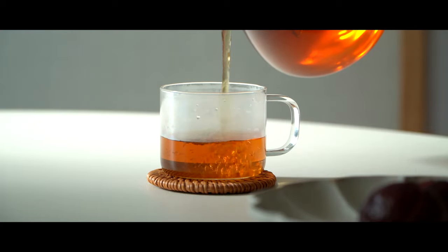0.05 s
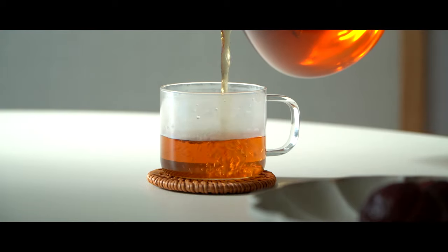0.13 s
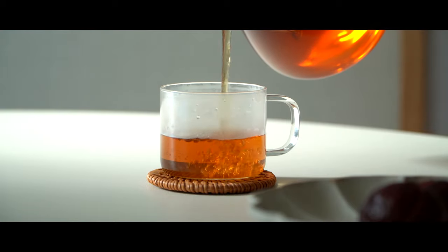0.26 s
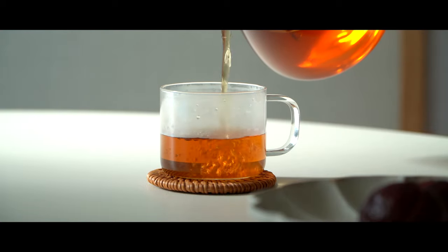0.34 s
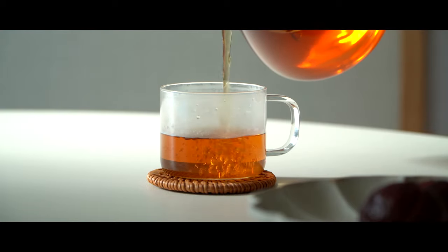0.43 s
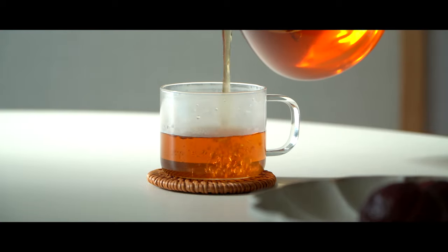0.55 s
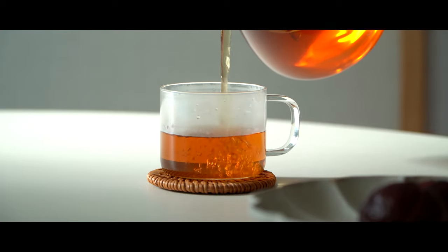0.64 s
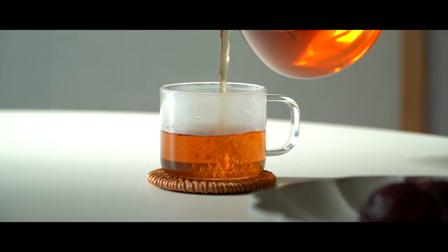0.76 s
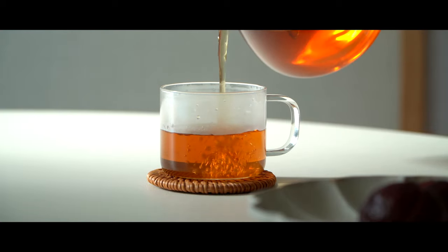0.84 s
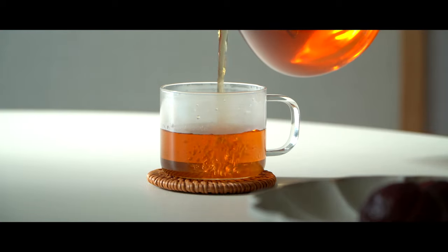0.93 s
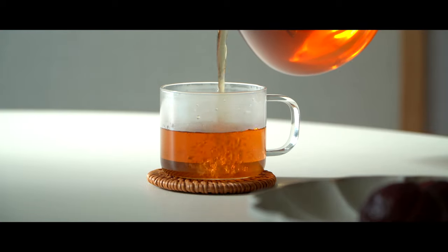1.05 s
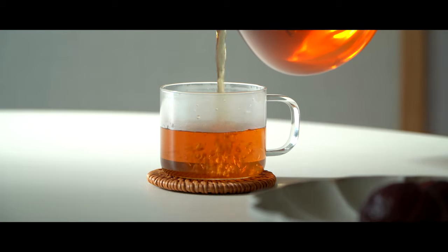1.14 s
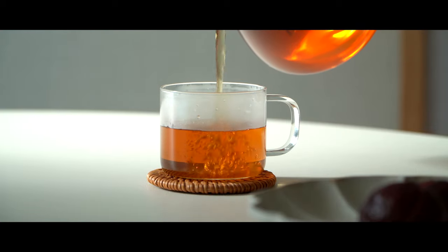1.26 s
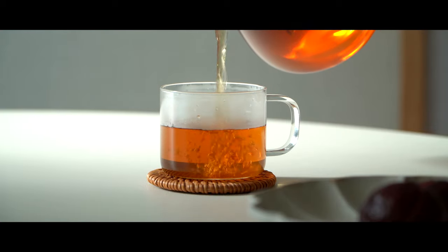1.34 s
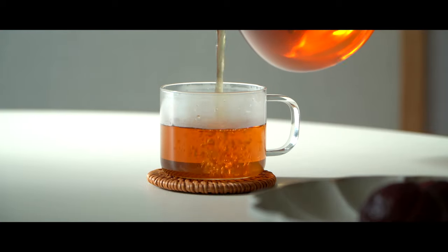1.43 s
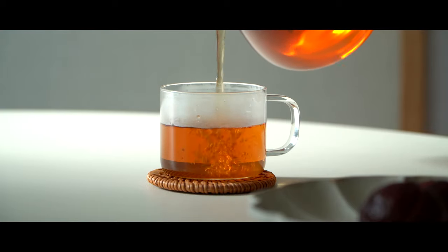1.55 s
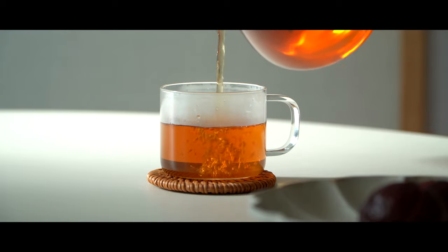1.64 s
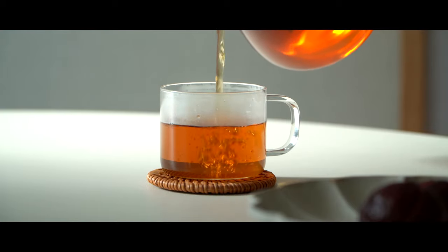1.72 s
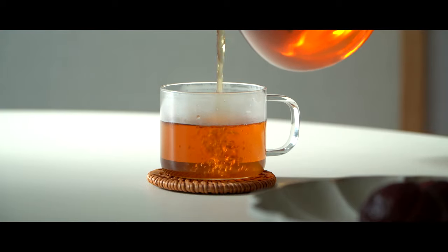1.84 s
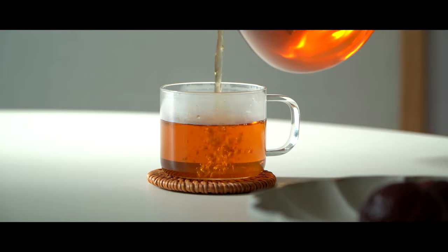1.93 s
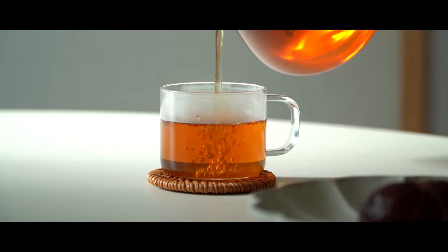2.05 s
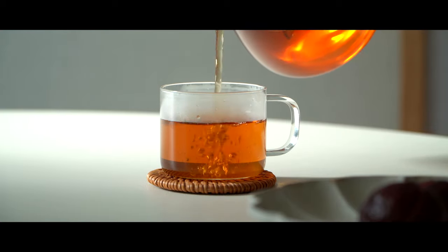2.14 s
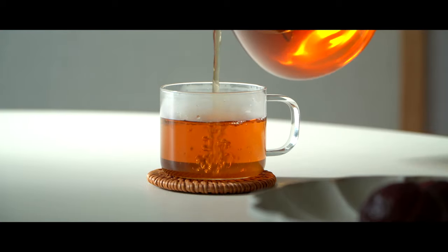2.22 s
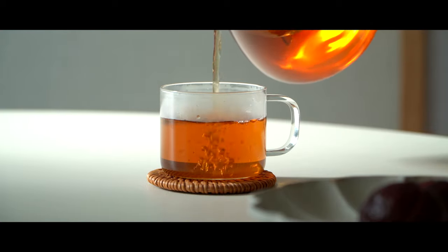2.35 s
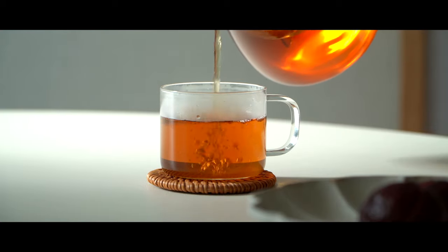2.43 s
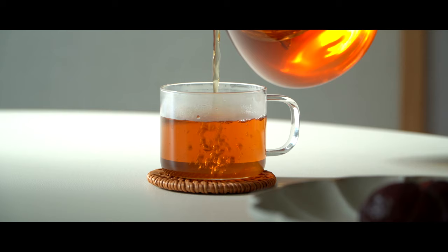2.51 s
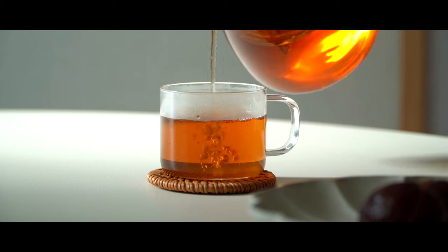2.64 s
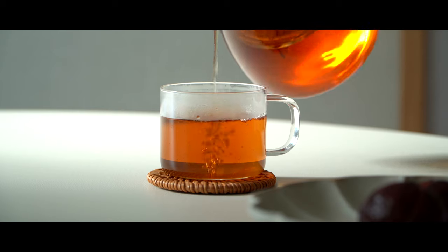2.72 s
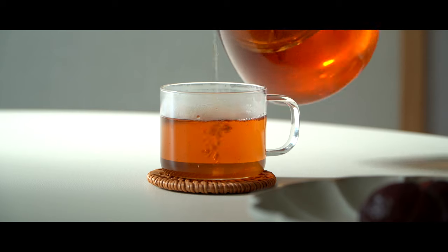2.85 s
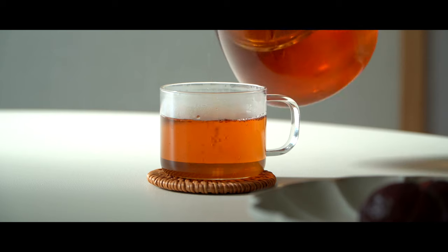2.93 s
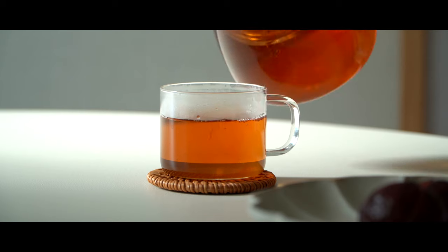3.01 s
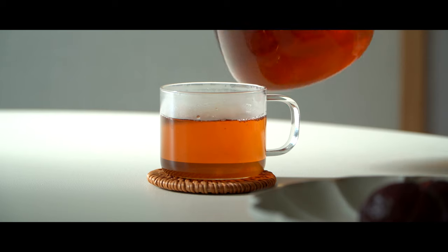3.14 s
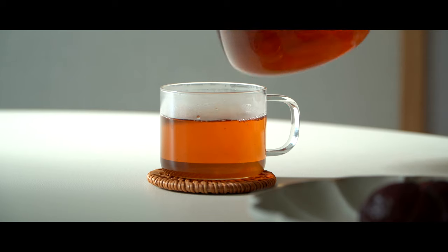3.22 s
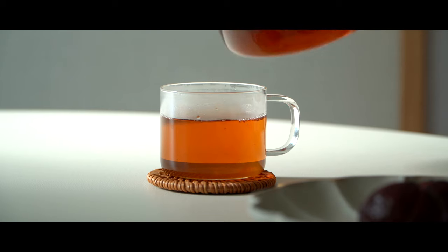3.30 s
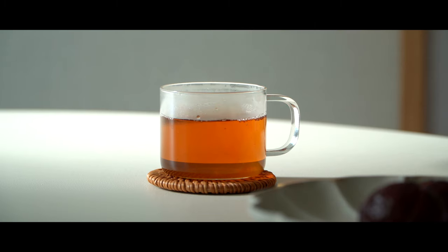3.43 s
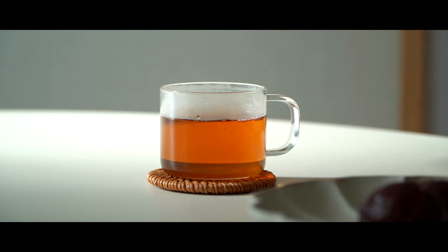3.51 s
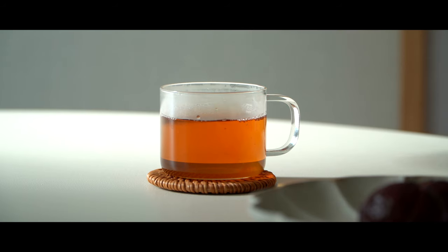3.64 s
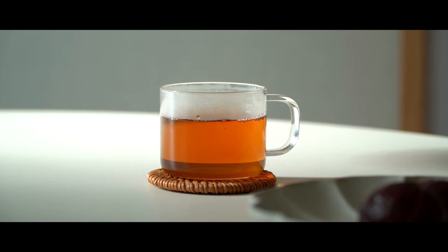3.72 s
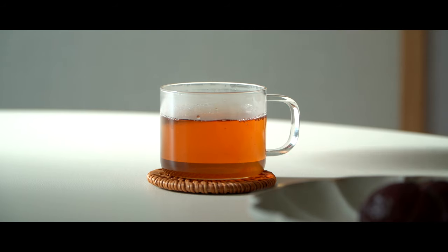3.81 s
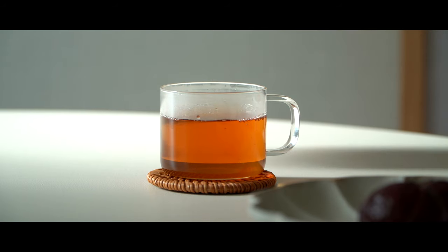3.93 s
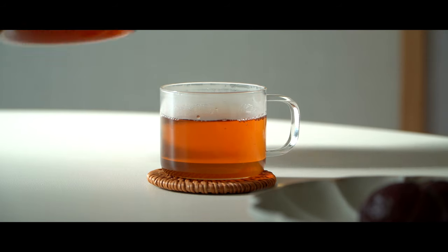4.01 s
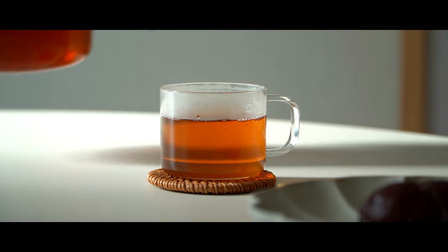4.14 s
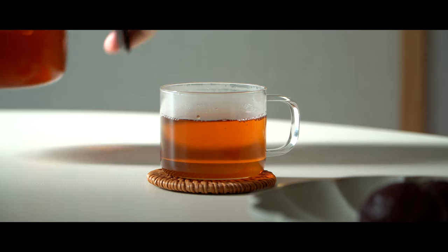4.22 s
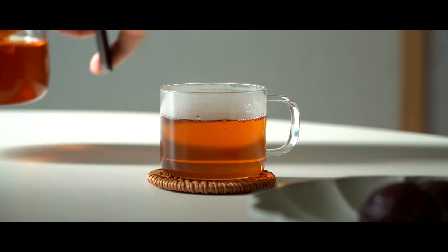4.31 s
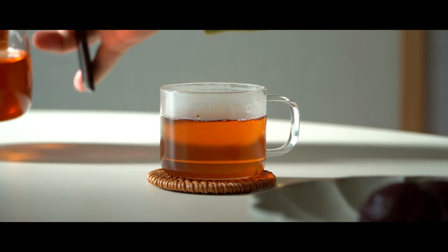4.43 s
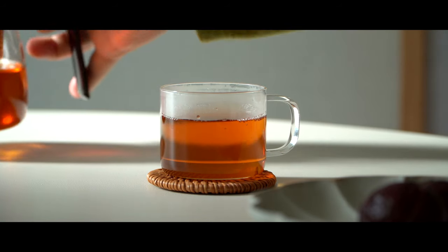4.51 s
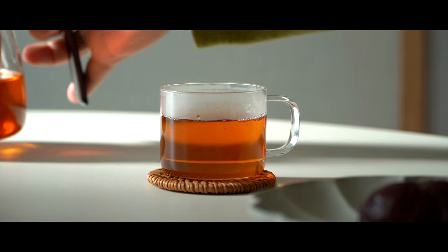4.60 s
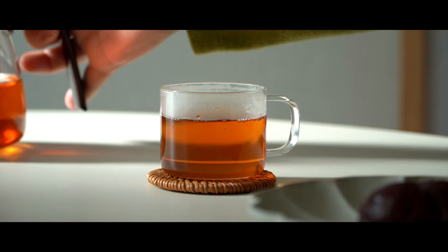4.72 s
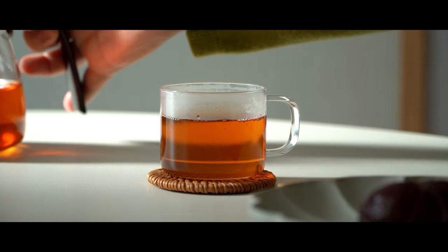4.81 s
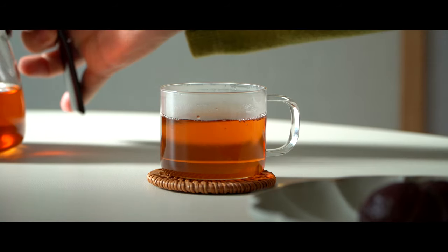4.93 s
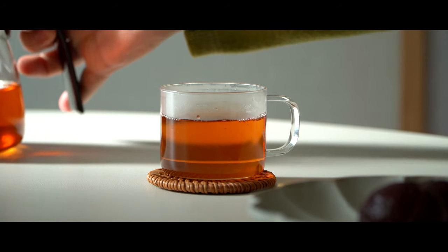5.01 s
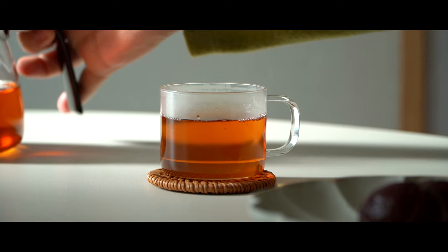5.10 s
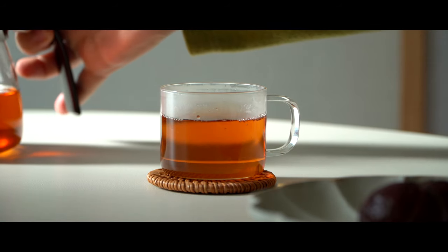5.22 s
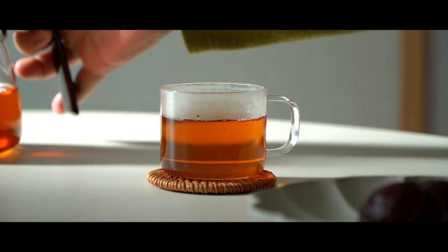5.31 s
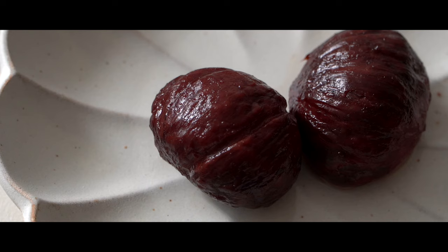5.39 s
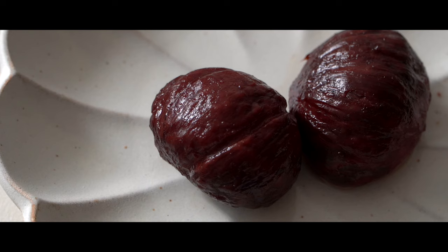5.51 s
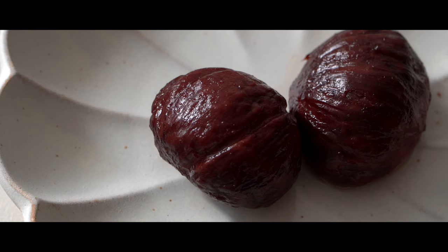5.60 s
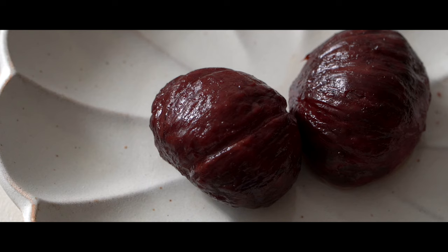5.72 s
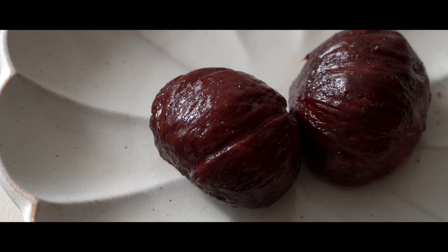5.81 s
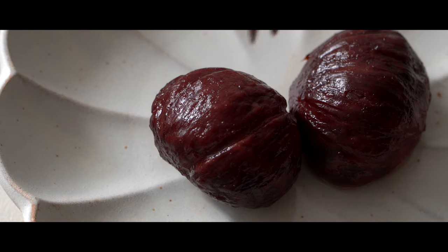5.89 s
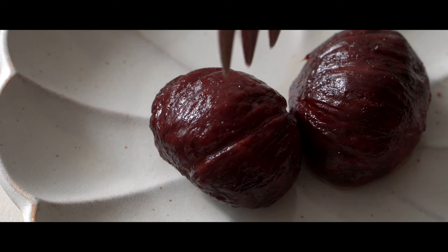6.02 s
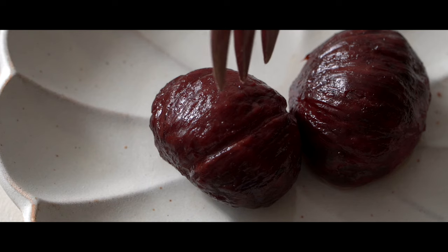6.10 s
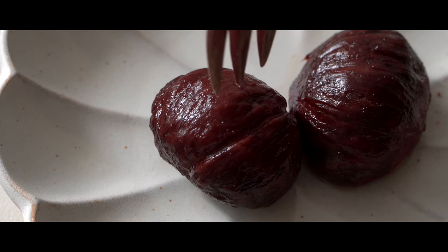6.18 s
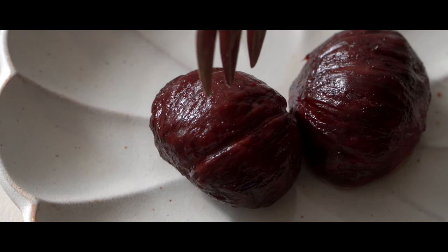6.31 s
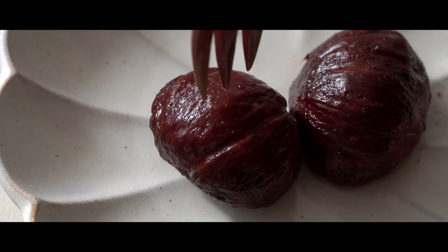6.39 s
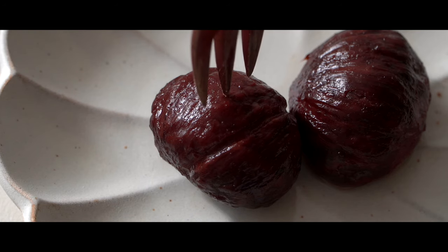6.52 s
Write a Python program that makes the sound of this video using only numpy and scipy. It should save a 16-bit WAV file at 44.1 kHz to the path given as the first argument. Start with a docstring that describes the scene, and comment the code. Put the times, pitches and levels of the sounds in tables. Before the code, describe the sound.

A close, detailed view of tea being poured in a quiet kitchen with short, soft reflections. From 0 s a thin stream already runs into a glass mug: rapid bright bubble blips mostly around 2 kHz, a fine swarm of smaller bubbles, gentle wash and a hollow hum that ends higher as the mug fills. Splashing fluctuates, with crisper clicks from about 1 s. From 2.3 s the flow thins to a trickle; the last clear drips fall near 2.9 s. Faint low gulps slosh in the pot between 2.7 and 3.6 s. Tiny froth ticks, begun under the pour, continue sparsely until 5 s, while a soft sleeve rustle swells from 3.5 to 4.9 s. At 4.97 s the pot knocks on the table, with a smaller bump and brief slide around 5.2 s. A faint, very high squeak comes at 5.5-5.7 s. Low rumble and soft hiss remain until 6.5 s.

```python
"""Tea runs from a glass pot into a glass mug on a table in a quiet kitchen, and ends in single drips.
Air bubbles ring as fading tones, over shaped noise for the wash and a hum of air in the mug.
From partway through the pour the froth ticks (tiny noise bursts); tea sloshes back (low bubbles, noise).
A soft rustle is heard, then the pot knocks and slides on the table, ringing it; a high squeak follows.
Rumble, a faint drone and hiss lie below, and fading echoes add the kitchen."""
import sys
import numpy as np
from scipy import signal
from scipy.fft import rfft, irfft
from scipy.io import wavfile

SR = 44100
rng = np.random.default_rng(int(sys.argv[2]) if len(sys.argv) > 2 else 0)


def transcribe(u):
    """Save the signal u as a 16-bit wav file named by the first command-line argument.

    u: samples, shape (n,) or (channels, n), limited to [-1, 1]; the rate is SR.
    q: integer samples, one column per channel.
    """
    v = np.clip(np.atleast_2d(u).T, -1, 1)
    q = np.round(v * 32767).astype(np.int16)
    wavfile.write(sys.argv[1], SR, q)


N = 288836
TIME = np.arange(N) / SR  # seconds

# Table levels are relative: the functions add their own trims. t60 is the time to fade by 60 dB.
# Clearest bubbles and drips of the pour, with two faint late pings after it:
# t/s, bubble level/dB, f/Hz, t60/s, plop level/dB, impact click level/dB
DROPS = [(.0173, -21, 4460, 0.021, -38, -27), (.0302, -20.5, 2840, .011, -45, -54),
         (.045, -21, 3830, 0.0028, -45, -32), (.1078, -16.5, 1880, 0.0098, -24.5, -32),
         (.1377, -15.5, 4520, .0035, -44, -44), (.2358, -14, 1920, 0.0034, -34.5, -53),
         (.2682, -25, 1760, 0.011, -48, -37), (.3354, -14, 1790, .007, -24, -34),
         (.3494, -13.5, 2200, 0.0024, -24, -43), (.3729, -36, 1930, .01, -26, -38.5),
         (.4265, -10.5, 1820, 0.0057, -25, -27), (.4667, -14, 2050, 0.0037, -24, -24.5),
         (.5033, -11.5, 2030, 0.0043, -25.5, -22), (.5465, -24, 2200, 0.0046, -34.5, -36.5),
         (.6125, -20.5, 3570, 0.0024, -66, -62), (.6669, -24.5, 2030, 0.014, -36.5, -45),
         (.6909, -24, 2620, 0.0057, -60, -65), (.7333, -26, 1830, 0.02, -40, -48),
         (.756, -15.5, 2296, 0.002, -42, -56), (.811, -23, 2060, 0.017, -40, -60),
         (.8369, -11.5, 1810, 0.0068, -23.5, -29.5), (.9585, -17.5, 2370, 0.0025, -39, -60),
         (1.0196, -12.5, 2000, 0.004, -24, -29), (1.1521, -32, 1810, 0.0027, -29, -33),
         (1.1647, -14, 1630, 0.0027, -25.5, -55), (1.1945, -19, 2204, 0.0062, -42, -60),
         (1.261, -11.5, 2150, 0.0034, -29.5, -39), (1.354, -22.5, 1960, 0.021, -35, -58),
         (1.3847, -17, 2130, .0087, -36, -17), (1.4037, -11.5, 2130, 0.0025, -21.5, -33),
         (1.4094, -26, 2180, .015, -25.5, -23), (1.4546, -18.5, 2300, 0.0086, -29.5, -18),
         (1.5043, -11.5, 1800, 0.0065, -29.5, -56), (1.539, -19, 2550, 0.012, -39.5, -54),
         (1.5491, -15, 2000, 0.0028, -28.5, -47), (1.5746, -18, 2130, 0.0046, -27.5, -38),
         (1.6292, -22, 2800, 0.0027, -31, -57), (1.694, -17.5, 4130, .0055, -30.5, -11),
         (1.768, -17, 6350, 0.0026, -45, -62), (1.7802, -19, 2360, 0.0058, -28.5, -25.5),
         (1.8286, -19, 3100, 0.0025, -37, -33), (1.8411, -40, 2780, .005, -31.5, -27.5),
         (1.8838, -6, 2587, 0.0033, -24.5, -46), (1.8989, -28, 2900, .0096, -23.5, -19),
         (1.9369, -21.5, 2535, 0.01, -31, -60), (2.008, -14, 2340, 0.004, -27.5, -28),
         (2.0447, -24, 2033, 0.0033, -39, -44), (2.082, -7.5, 1792, .003, -26, -25.5),
         (2.1616, -17, 2400, 0.01, -59, -62), (2.2411, -16, 2178, 0.0026, -44, -59),
         (2.2506, -17, 2666, 0.0026, -29.5, -26.5), (2.396, -17.5, 2810, 0.0026, -28, -32),
         (2.4232, -21.5, 2460, 0.011, -62, -49), (2.4911, -11, 1870, 0.0039, -31.5, -46),
         (2.611, -21.5, 3050, 0.0032, -57, -52), (2.6389, -23, 1900, 0.0084, -37, -60),
         (2.6997, -18, 1965, 0.0025, -35, -55), (2.7285, -17.5, 2030, 0.004, -43, -67),
         (2.7539, -28, 2770, 0.0088, -45, -66), (2.7718, -15, 2480, 0.0087, -40, -61),
         (2.8034, -20, 2770, 0.012, -40.5, -59), (2.8197, -19.5, 2530, .003, -46, -29.5),
         (2.8375, -18, 2180, 0.0024, -62, -35), (2.8988, -20, 4170, 0.0072, -35, -31.5),
         (2.9119, -18.5, 2030, 0.0025, -31.5, -36), (3.834, -40.5, 3700, 0.0076, -71, -70),
         (3.962, -50, 3600, 0.015, -75, -66)]
# Strength of the stream's steady splashing: t/s, level/dB
STREAM = [(0.0, -35.5), (0.38, -43.5), (0.48, -45), (0.83, -45), (0.99, -45.5), (1.23, -52.5), (1.42, -43),
          (1.73, -43), (2.04, -39.5), (2.21, -47), (2.5, -52), (2.63, -51.5), (2.77, -51.5), (3.0, -46)]
# Pitch of the air above the tea, which ends higher as the mug fills: t/s, f/Hz
MUG_AIR_PITCH = [(0, 814), (.2, 801), (.4, 685), (1.0, 752), (1.5, 711.4), (2.0, 740), (2.5, 775),
                 (2.75, 887), (2.9, 1105)]
# How strong small bubbles of each pitch are: f/Hz, level/dB
SMALL_BUBBLE_COLOUR = [(1300, -2), (1550, 1), (2200, 6.5), (3000, -3.5), (3700, -6), (4500, 9.5),
                       (5500, -1), (6500, 4.5)]
# Colour of the rushing water noise: f/Hz, level/dB
WASH_COLOUR = [(50, -1), (80, -2), (110, -11), (168, 19), (220, -4), (330, 7.5), (450, 2), (650, -11),
               (790, -11), (920, -26), (1100, -31), (1400, -30), (1600, -6.5), (2400, 13), (3500, -2),
               (4500, -18), (7000, -15), (12000, -33)]
# Colour of the impact and froth clicks: f/Hz, level/dB
CLICK_COLOUR = [(1000, -2), (2500, 6.5), (6500, 10), (8300, 4.5), (10000, 10), (11000, 7), (12500, 13),
                (15000, 4.5), (17000, 1)]
# Treble of the impact clicks: very dull at first, brighter by 0.9 s, then varying: t/s, level/dB
CLICK_TREBLE = [(0, -39), (.9, 5), (1.3, -9), (1.7, -0.5), (3.0, -1)]
# Sideways resonances of the air in the mug: f/Hz, width/Hz, level/dB
MUG_MODES = [(1130, 44, -44), (1536, 47, -18), (1540, 49, 2.5), (1738, 88, -17.5), (2177, 37, -11),
             (2520, 68, -19), (2755, 190, -18.5), (4510, 840, -21.5)]
# Resonances of the mug on its coaster: f/Hz, level/dB, t60/s
BASE_MODES = [(83.6, -21.5, 0.35), (113.7, -22, 0.24), (167, -10.5, 0.14), (254, -25, 0.16),
              (333, -22, 0.023), (416, -28, 0.039), (498, -10, 0.031)]
# Tones of the mug after the last drip: f/Hz, level/dB, t60/s
LAST_RING = [(1165, -43, .2), (1240, -42, .19), (1414, -43, .1), (4560, -49, .17)]
# Clearest froth bubbles bursting: t/s, level/dB
TICKS = [(3.2155, -37), (3.256, -37), (3.3016, -40), (3.3446, -39), (3.519, -34), (3.55, -33.5),
         (3.7363, -33), (4.0791, -35), (4.2698, -32.5), (4.3558, -40), (4.4552, -41.5), (4.8224, -44.5),
         (4.8904, -49), (5.0236, -40)]
# Tea running back from the spout into the pot: t/s, level/dB, f/Hz, t60/s
GULPS = [(2.715, -47, 415, 0.07), (3.089, -47.5, 625, 0.029), (3.097, -42.5, 507, 0.074),
         (3.413, -50, 500, 0.033), (3.63, -48.5, 690, 0.053), (3.632, -49.5, 1390, 0.061)]
# The pot meets the table: t/s, level/dB, contact brightness f/Hz
KNOCKS = [(4.9689, -18.5, 3000), (4.993, -52, 500), (5.012, -35, 450), (5.21, -46, 2500)]
# Resonances of the table top with the glass pot on it: f/Hz, level/dB, t60/s
TABLE_MODES = [(75, -31.5, 0.55), (150, -16.5, 0.12), (186.3, -14, 0.09), (239, -10, 0.13),
               (289, -14.5, 0.23), (326, -14.5, 0.22), (369.5, -14.5, 0.19), (397, -3.5, 0.099),
               (504, 1, 0.022), (587, -4.5, 0.054), (663, -9.5, 0.062), (863, -21, 0.16), (1157, -36, 0.3),
               (1467, -29, 0.093)]
# Higher, glassy resonances of pot and table: f/Hz, level/dB, t60/s
GLASS_MODES = [(1500, 8, 0.029), (2450, 0, 0.058), (2940, -7, 0.083), (3610, 2, 0.086), (4160, -8, 0.082),
               (5680, 1.5, 0.073), (7000, -12, .09), (9700, -2, 0.056)]
# Colour of the crunch of the landing: f/Hz, level/dB
CRUNCH_COLOUR = [(300, -6), (700, 4), (1100, 1), (1500, -3.5), (2200, -16.5), (4000, -11.5), (5500, -13),
                 (8000, -22), (14000, -35)]
# The pot slides on its base: t/s, friction level/dB
SLIDE = [(5.19, -89), (5.21, -59.5), (5.255, -73.5), (5.295, -59.5), (5.362, -59.5), (5.385, -96)]
# A faint high squeak: t/s, f/Hz, level/dB
SQUEAK = [(5.52, 12600, -99), (5.54, 12770, -64), (5.556, 12946, -67), (5.586, 13045, -66),
          (5.666, 12867, -60), (5.7, 12700, -76), (5.72, 12600, -85)]
# Loudness of the rustle as the pot is carried across: t/s, level/dB
CARRY = [(3.5, -71), (3.72, -62.5), (4.1, -64), (4.4, -61.5), (4.65, -68), (4.9, -82)]
# Colour of that rustle: f/Hz, level/dB
RUSTLE_COLOUR = [(500, 1), (1100, -6.5), (1700, 0.5), (2400, -9), (4500, -12), (9000, -20)]
# Loudness of the low room rumble: t/s, level/dB
RUMBLE_LEVEL = [(0, -64.5), (3.0, -61.5), (4.8, -61), (5.35, -56), (5.9, -58.5), (6.55, -60.5)]
# Colour of the rumble: f/Hz, level/dB
RUMBLE_COLOUR = [(12, -39), (20, 2), (54, 9), (124, 3), (178, 2.5), (677, -8), (826, -5), (990, -15),
                 (1500, -11.5), (1950, -31), (3300, -120)]
# Loudness of the soft hiss: t/s, level/dB
HISS_LEVEL = [(0, -68), (3.5, -67), (4.5, -70.5), (5.37, -65.5), (5.39, -62), (6.55, -65.5)]
# Colour of the hiss: f/Hz, level/dB
HISS_COLOUR = [(590, -10), (1000, 1), (1400, -6), (1690, -2), (1870, -1), (2030, -2.5), (5070, -6.5),
               (8070, -9), (16000, -13)]
# Colour of the faint drone: f/Hz, level/dB
DRONE_COLOUR = [(130, -22), (190, -3), (270, 0), (330, -16.5), (450, -25), (1000, -72), (4000, -80)]
# Strength of the kitchen echoes: f/Hz, level/dB
ROOM_COLOUR = [(100, 4), (400, -5.5), (800, -8.5), (2000, -11), (4000, -19), (8000, -15), (14000, -16)]
# How long the kitchen echoes last: f/Hz, t60/s
ROOM_T60 = [(100, 0.18), (700, .28), (2000, 0.29), (6000, 0.2), (14000, 0.27)]

# The pot is tilted back: full flow thins to a trickle and stops
THIN_START_S, THINNING_S, TRICKLE_SHARE, POUR_END_S = 2.3, 0.19, 0.29, 2.95
# Weak bubbles lie nearer the surface and rise faster in pitch:
# the rate at RISE_AT_DB doubles for every RISE_DOUBLING_DB below it
RISE_OCTAVES_PER_S, RISE_AT_DB, RISE_DOUBLING_DB = 14, -20, 8


def pour(swarm_db=-7.0, wash_db=-16.5, hum_db=-15.0, flutter_db=8.5):
    """Bubbles, wash and hum under a fluttering stream, coloured by the hollow of the mug."""
    hollow_db, bounce_s = 4.5, 0.0017
    stream_db, = in_time(STREAM)
    flutter = flutter_db * rms_one(band(rng.standard_normal(N), hz=34.4, kind="low"))
    rush = from_db(wash_db + flutter) * noise(WASH_COLOUR)
    hum = from_db(hum_db) * mug_air()
    wash = (TIME < POUR_END_S) * (rush + hum)
    splashing = from_db(swarm_db) * small_bubbles() + wash
    water = from_db(stream_db + lull_db(TIME)) * splashing + large_bubbles()
    hollow = sum(from_db(db) * resonance(water, hz, width) for hz, width, db in MUG_MODES)
    # the hollow answers a moment after each splash
    late_hollow = np.interp(TIME - bounce_s, TIME, hollow, left=0)
    return water + from_db(hollow_db) * late_hollow


def large_bubbles(bubble_db=-4.0, plop_db=-4.5, thud_db=-8.5, click_db=1.5, lowest_hz=1250, treble_hz=9000):
    """Each pocket rings, sheds a smaller bubble, puffs the air in the mug and thuds through its base."""
    plop_t60, plop_spread = 0.032, 0.06
    shed_s, shed_db, shed_ratio = 0.003, -9, 1.458  # typical delay, relative level, typical pitch ratio
    rings, plops, pushes = np.zeros((3, N))
    drops = list(DROPS) + middling_bubbles()
    variations = rng.standard_normal((len(drops), 5))
    for (s, db, hz, t60, puff_db, _), (detune, lag, size, sense, depth) in zip(drops, variations):
        t60 = max(t60, 0.003)
        doublings = min((RISE_AT_DB - db) / RISE_DOUBLING_DB - depth, 2)
        rise = RISE_OCTAVES_PER_S * 2 ** doublings
        add(rings, s, from_db(db + bubble_db) * bubble(hz, t60, rise, attack_s=0.00027))
        shed = bubble(hz * shed_ratio * np.exp(0.25 * size), t60, 2 * rise, attack_s=0.00027)
        add(rings, s + shed_s * np.exp(0.67 * lag), from_db(db + bubble_db + shed_db) * shed)
        air_hz = np.interp(s, *np.transpose(MUG_AIR_PITCH)) * np.exp(plop_spread * detune)
        add(plops, s, from_db(puff_db + plop_db) * bubble(air_hz, plop_t60, 0, attack_s=0.00072))
        # the push on the water is a single-sample kick, up or down at random
        add(pushes, s, np.sign(sense) * from_db([puff_db + thud_db]))
    impacts = clicks([(row[0], row[-1] + click_db) for row in drops], t60=0.0043)
    dull = band(impacts, treble_hz, "low", order=1)
    impacts = dull + from_db(in_time(CLICK_TREBLE)[0]) * (impacts - dull)
    bright_rings = band(rings, lowest_hz, "high", order=4)
    return bright_rings + plops + splats(pushes) + mug_thuds(pushes) + impacts


def middling_bubbles(spread_db=2.5, pitch_spread=0.17, t60_spread=0.26, puff_spread_db=7.5, follows=0.57):
    """The stream breaks into beads at a loose pace; a stronger one traps louder bubbles. Rows as in DROPS."""
    per_s = 48  # about this many at full flow
    typical_db, typical_hz, typical_t60, plop_db, click_db = -27, 2118, 0.012, -50.5, -50
    count = int(per_s * STREAM[-1][0])
    times, levels = np.transpose(STREAM)
    timing = rng.random((count, 2))
    variations = rng.standard_normal((count, 5)).clip(-2, 2)
    rows = []
    for k, ((slip, luck), (loud, size, life, puff, crack)) in enumerate(zip(timing, variations)):
        s = (k + slip) / count * POUR_END_S
        stream_push_db = follows * (np.interp(s, times, levels) - np.median(levels))
        push_db = stream_push_db + spread_db * loud + lull_db(s)
        if luck < flow_at(s):
            hz = typical_hz * np.exp(pitch_spread * size)
            t60 = typical_t60 * np.exp(t60_spread * life)
            puff_db = plop_db + push_db + puff_spread_db * puff
            crack_db = click_db + push_db + puff_spread_db * crack
            rows.append((s, typical_db + push_db, hz, t60, puff_db, crack_db))
    return rows


def small_bubbles(cycles=17, rise=45):
    """A swarm of small, short-lived bubbles; in a thin flow they come fewer and stand out; rms 1 in the pour."""
    per_s, spread_db = 600, 4.0  # about this many at full flow
    out = np.zeros(N)
    low, high = SMALL_BUBBLE_COLOUR[0][0], SMALL_BUBBLE_COLOUR[-1][0]
    for when, size, strength, depth, luck in rng.random((int(per_s * STREAM[-1][0]), 5)):
        s = when * POUR_END_S
        if luck < flow_at(s):
            hz = low * (high / low) ** size
            db = at_hz(SMALL_BUBBLE_COLOUR, hz) + spread_db * min(-np.log(strength), 3)
            gain = from_db(db) / np.sqrt(flow_at(s))
            t60 = cycles / hz * (0.5 + depth)
            add(out, s, gain * bubble(hz, t60, 2 * rise * depth ** 2, attack_s=0.00053))
    return out / np.sqrt(np.mean(out[:int(POUR_END_S * SR)] ** 2))


def mug_air(width_hz=45):
    """The stream keeps the air column of the mug humming in a narrow, moving band; rms 1."""
    phase = 2 * np.pi * np.cumsum(in_time(MUG_AIR_PITCH)[0]) / SR
    a, b = band(rng.standard_normal((2, N)), width_hz, "low")
    return rms_one(a * np.cos(phase) + b * np.sin(phase))


def splats(pushes, splat_db=-5.0, splat_hz=1380, width_hz=350, splat_t60=0.032):
    """Water slaps shut over each pocket with a short burst of mid-range noise."""
    burst = signal.lfilter([1], [1, -fade(1 / SR, splat_t60)], np.abs(pushes) + 1e-18)
    narrow = resonance(rng.standard_normal(N), splat_hz, width_hz)
    slap_noise = resonance(narrow, splat_hz, 2 * width_hz)
    return from_db(splat_db) * burst * rms_one(slap_noise)


def mug_thuds(pushes):
    """Pushes pass through the mug's base; it presses harder as it fills, so the deepest thuds grow."""
    deep_hz, deep_start_db, deep_db_per_s = 129, -7.5, 5.0
    weight = from_db(deep_start_db + deep_db_per_s * np.minimum(TIME, THIN_START_S))
    deep = body(pushes * weight, [mode for mode in BASE_MODES if mode[0] < deep_hz])
    upper = body(pushes, [mode for mode in BASE_MODES if mode[0] >= deep_hz])
    return band(deep + upper, hz=59.5, kind="high")


def flow_at(s):
    """Share of the full flow at a time: full at first, then thinning to a trickle."""
    return np.interp(s, [THIN_START_S, THIN_START_S + THINNING_S], [1, TRICKLE_SHARE])


def lull_db(s):
    """Before a large pocket closes, the stream runs smoothly into its cavity and the splashing lulls."""
    lull_s, deepest_db, large_above_db = 0.032, -6.5, -18
    starts = np.sort([row[0] for row in DROPS if row[1] > large_above_db] + [np.inf])
    wait = starts[np.searchsorted(starts, s)] - s
    return deepest_db * np.exp(-(wait / lull_s) ** 2)


def last_drip(drip_s=2.899):
    """With the surface calm again, the mug rings on after the last drip."""
    return body(signal.unit_impulse(N, int(drip_s * SR)), LAST_RING)


def froth(faint_db=-46.5, spread_db=3.0, fade_db_per_s=0.37, tick_db=-3.5):
    """Once froth has built up, it bursts in a few clear ticks and many faint ones that slowly weaken."""
    per_s, first_s, last_s = 34, 1.2, 4.95
    draws = rng.random((int(per_s * (last_s - first_s)), 2)) * [last_s - first_s, 1]
    faint = []
    for age, size in draws:
        db = faint_db - fade_db_per_s * age + spread_db * min(-np.log(size), 2)
        faint.append((first_s + age, db))
    clear = [(s, db + tick_db) for s, db in TICKS]
    return clicks(clear + faint, t60=0.0044, attack_s=0.0009)


def slosh(splash_db=-16.5, splash_t60=0.13):
    """Tea running back from the spout gulps in the pot, each gulp with a little splash."""
    gulps, splash = np.zeros((2, N))
    for s, db, hz, t60 in GULPS:
        add(gulps, s, from_db(db) * bubble(hz, t60, rise=0.069, attack_s=0.00073))
        add(splash, s, from_db(db + splash_db) * fade(TIME[:SR // 4], splash_t60))
    return gulps + splash * noise(WASH_COLOUR)


def teapot(glass_db=-32.0, crunch_db=-18.0, crunch_t60=0.14, rub_table_db=-19.0, rub_glass_db=-30.5):
    """The pot lands, rocks and slides; blows and friction ring the table and the glass."""
    blows, crunch = np.zeros((2, N))
    t = TIME[:SR // 6]
    for s, db, contact_hz in KNOCKS:
        add(blows, s, from_db(db) * band(signal.unit_impulse(len(t)), contact_hz, "low"))
        shape = fade(t, crunch_t60) * (1 - np.exp(-t / 0.0011))
        grit = band(noise(CRUNCH_COLOUR, size=len(t)), 2 * contact_hz, "low", order=1)
        add(crunch, s, from_db(db + crunch_db) * shape * grit)
    sliding = (TIME > SLIDE[0][0]) & (TIME < SLIDE[-1][0])
    friction = rng.standard_normal(N) * from_db(in_time(SLIDE)[0]) * sliding
    table = body(blows + from_db(rub_table_db) * friction, TABLE_MODES)
    glass = body(from_db(glass_db) * blows + from_db(rub_glass_db) * friction, GLASS_MODES)
    return table + glass + crunch


def squeak():
    """A thin, very high arching whistle: one sine with a slight random waver in pitch."""
    hz, db = in_time(SQUEAK)
    waver = 1 + 0.0031 * rms_one(band(rng.standard_normal(N), hz=150, kind="low"))
    sounding = (TIME > SQUEAK[0][0]) & (TIME < SQUEAK[-1][0])
    whistle = np.sqrt(2) * np.sin(2 * np.pi * np.cumsum(hz * waver) / SR)  # rms 1
    return sounding * from_db(db) * whistle


def rustle():
    """A sleeve brushes softly while the pot is carried: coloured noise that swells and fades."""
    return from_db(in_time(CARRY)[0]) * noise(RUSTLE_COLOUR)


def ambience():
    """Low room rumble, a soft hiss and a faint drone that swells briefly and nearly vanishes at the end."""
    steady_db, swell_db, swell_s, swell_width_s = -63.5, 5.5, 4.12, 0.16
    drop_s, drop_db = 5.38, -25
    swell = swell_db * np.exp(-((TIME - swell_s) / swell_width_s) ** 2)
    drone_db = steady_db + swell + drop_db * (TIME > drop_s)
    rumble = from_db(in_time(RUMBLE_LEVEL)[0]) * noise(RUMBLE_COLOUR)
    hiss = from_db(in_time(HISS_LEVEL)[0]) * noise(HISS_COLOUR)
    return rumble + hiss + from_db(drone_db) * noise(DRONE_COLOUR)


def kitchen(x, first_echo_s=0.0034):
    """Diffuse reflections: noise that dies away at its own pace in each of eight pitch bands."""
    t, tail = TIME[:SR // 2], 0
    edges = np.geomspace(60, 17000, 9)
    for low, high in zip(edges, edges[1:]):
        hz = np.sqrt(low * high)
        shape = fade(t, at_hz(ROOM_T60, hz)) * (t > first_echo_s)
        echoes = rng.standard_normal(len(t)) * shape / np.sqrt(np.sum(shape ** 2))
        tail = tail + from_db(at_hz(ROOM_COLOUR, hz)) * band(echoes, [low, high], "band")
    return signal.fftconvolve(x, tail)[:N]


def bubble(hz, t60, rise, attack_s):
    """A pocket of air rings as a fading sine, its pitch rising by `rise` octaves/s near the surface."""
    t = TIME[:int(1.3 * t60 * SR) + 40]
    pitch = hz * 2 ** np.minimum(rise * t, 1)  # at most one octave up
    shape = fade(t, t60) * (1 - np.exp(-t / attack_s))
    return shape / shape.max() * np.sin(2 * np.pi * np.cumsum(pitch) / SR)


def clicks(rows, t60, attack_s=0.00087):
    """Very short bright cracks of noise from rows of (t/s, peak level/dB)."""
    out, t = np.zeros(N), TIME[:512]
    shape = fade(t, t60) * (1 - np.exp(-t / attack_s))
    for s, db in rows:
        crack = noise(CLICK_COLOUR, size=len(t)) * shape
        add(out, s, from_db(db) * crack / np.abs(crack).max())
    return out


def body(force, modes):
    """A solid rings in its modes, neighbours in opposite sense."""
    return sum((-1) ** k * from_db(db) * ring(force, hz, t60) for k, (hz, db, t60) in enumerate(modes))


def ring(force, hz, t60):
    """A unit click sets a fading sine ringing, starting from zero."""
    r, w = fade(1 / SR, t60), 2 * np.pi * hz / SR
    return signal.lfilter([0, np.sin(w)], [1, -2 * r * np.cos(w), r * r], force + 1e-18)


def resonance(x, hz, width_hz):
    """A hollow favours one pitch: band-pass with gain about 1 at its peak."""
    r = np.exp(-np.pi * width_hz / SR)
    top = np.array([1, 0, -1]) * (1 - r * r) / 2
    return signal.lfilter(top, [1, -2 * r * np.cos(2 * np.pi * hz / SR), r * r], x + 1e-18)


def noise(spectrum, size=N):
    """Noise of a given colour, rms 1."""
    gains = from_db(at_hz(spectrum, np.fft.rfftfreq(size, 1 / SR)))
    return rms_one(irfft(rfft(rng.standard_normal(size)) * gains, size))


def band(x, hz, kind, order=2):
    """Butterworth filter; the tiny offset avoids slow arithmetic on near-silence."""
    sos = signal.butter(order, np.minimum(hz, SR / 2 - 1), kind, fs=SR, output="sos")
    return signal.sosfilt(sos, x + 1e-18)


def fade(t, t60):
    """Exponential decay, 60 dB down after t60 seconds."""
    return np.exp(-np.log(1000) * t / t60)


def from_db(db):
    """Decibels to gain."""
    return 10 ** (np.asarray(db) / 20)


def rms_one(x):
    """Scale to unit rms (average strength 1)."""
    return x / np.sqrt(np.mean(x ** 2) + 1e-20)


def in_time(rows):
    """Each column of a curve at every sample."""
    s, *columns = np.transpose(rows)
    return [np.interp(TIME, s, c) for c in columns]


def at_hz(points, hz):
    """Read a spectrum on a log-frequency axis."""
    points = np.array(points)
    return np.interp(np.log(np.maximum(hz, 1)), np.log(points[:, 0]), points[:, 1])


def add(out, s, sound):
    """Mix a short sound in at a time in seconds."""
    i = int(np.clip(round(s * SR), 0, N - 1))
    out[i:i + len(sound)] += sound[:N - i]


def scene():
    """All sources on the table with their kitchen echoes, over the quiet room."""
    room_tone = ambience()
    direct = teapot() + squeak() + rustle() + slosh() + froth() + last_drip() + pour()
    return (direct + kitchen(direct) + room_tone)[None]


def record(dry, cutoff_hz=16500):
    """The very top of the treble is cut steeply."""
    return signal.sosfilt(signal.ellip(10, 0.1, 80, cutoff_hz, fs=SR, output="sos"), dry)


dry = scene()
out = record(dry)
transcribe(out)
```